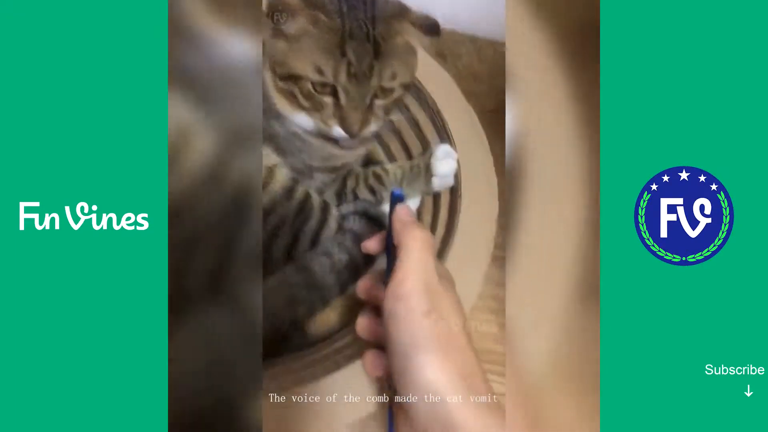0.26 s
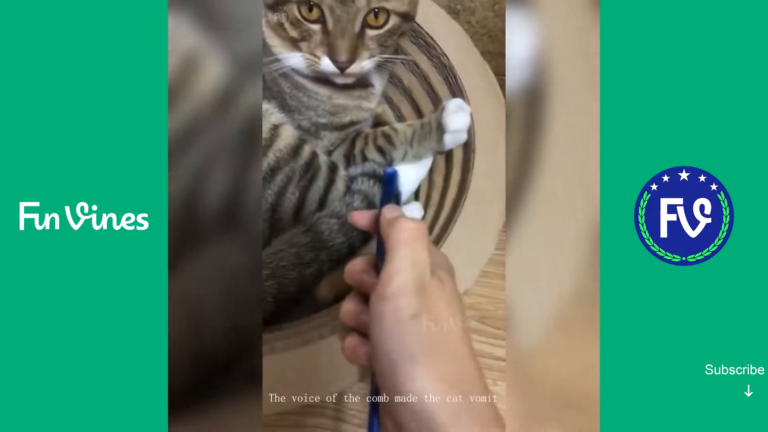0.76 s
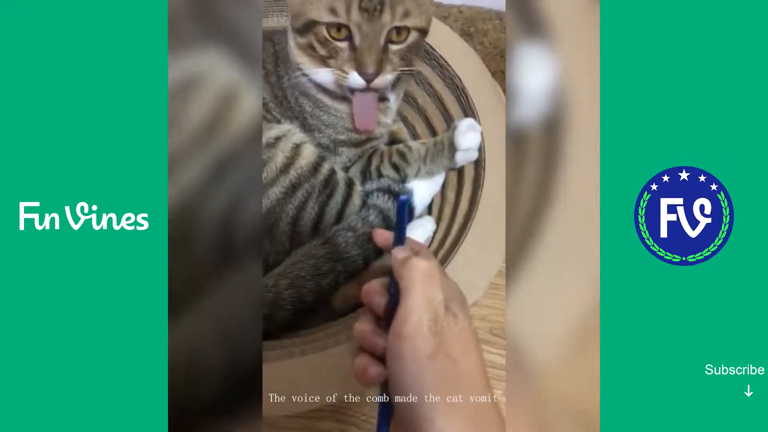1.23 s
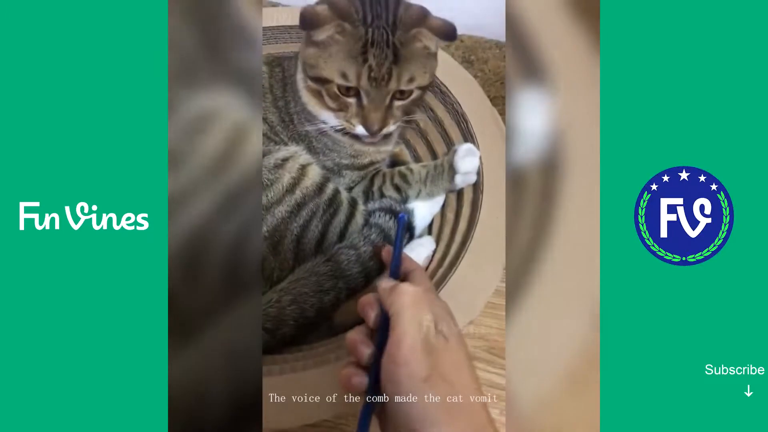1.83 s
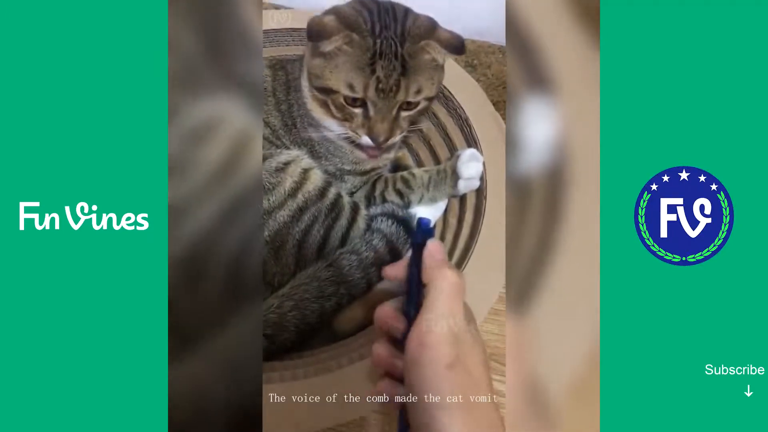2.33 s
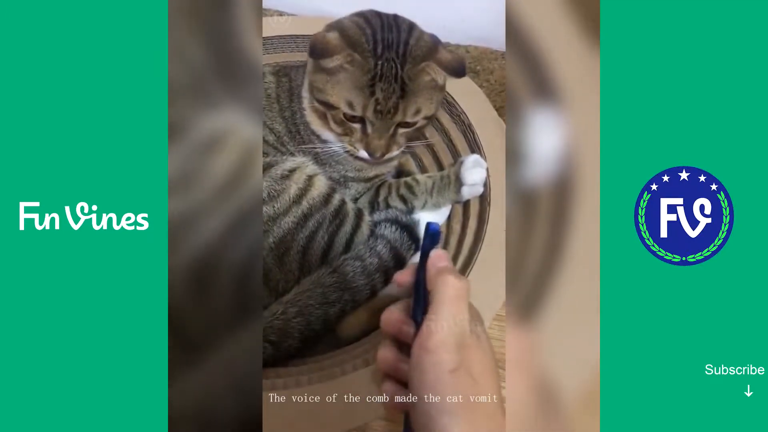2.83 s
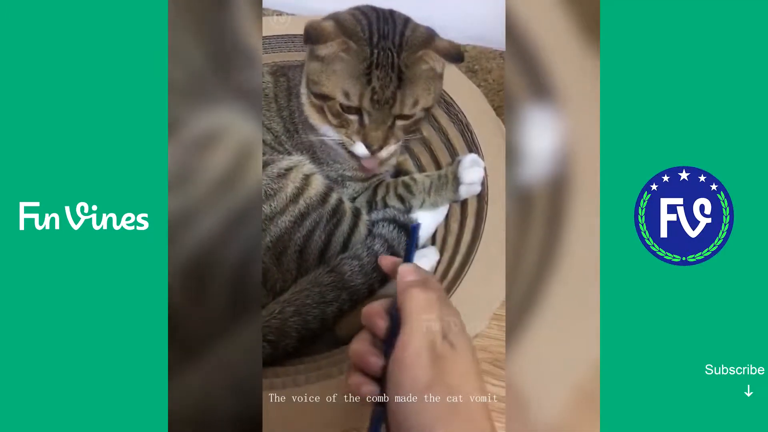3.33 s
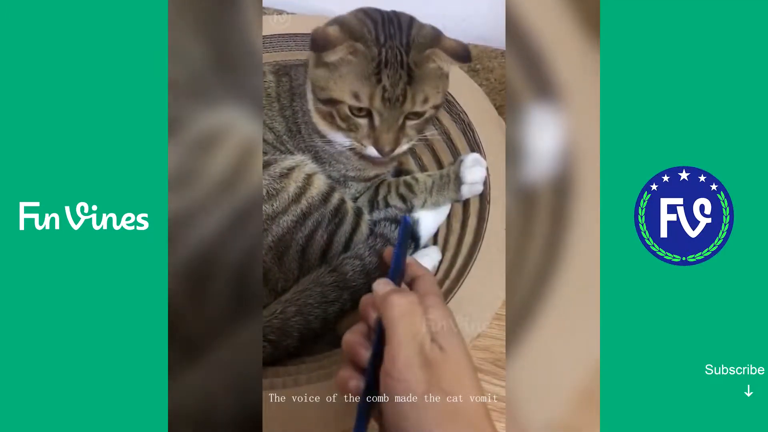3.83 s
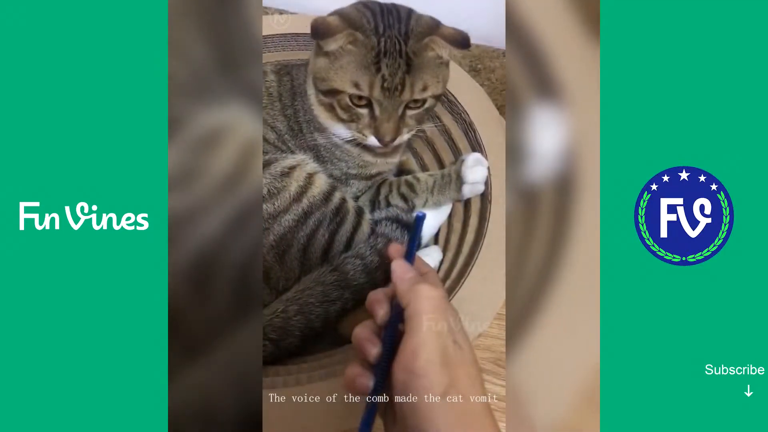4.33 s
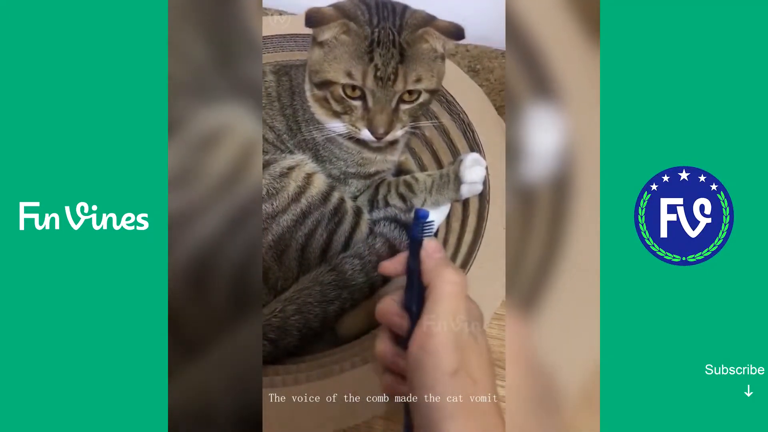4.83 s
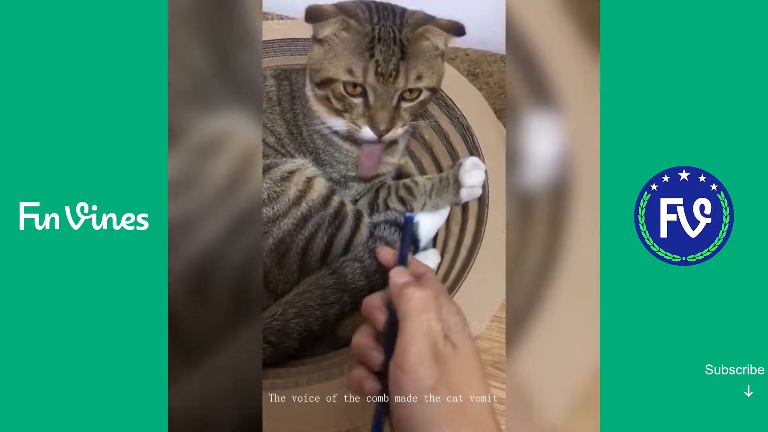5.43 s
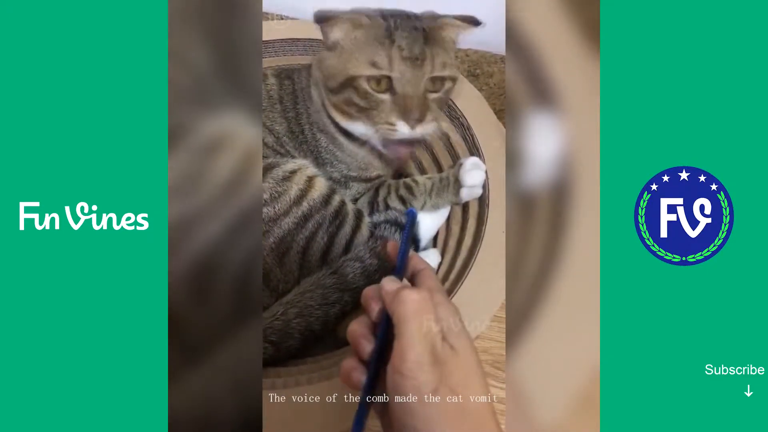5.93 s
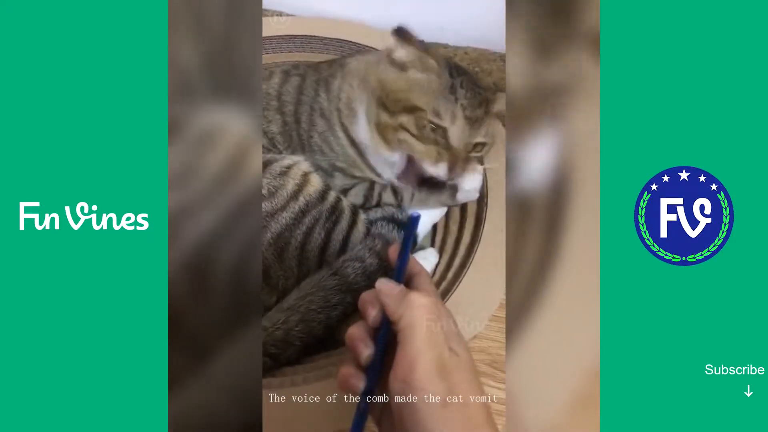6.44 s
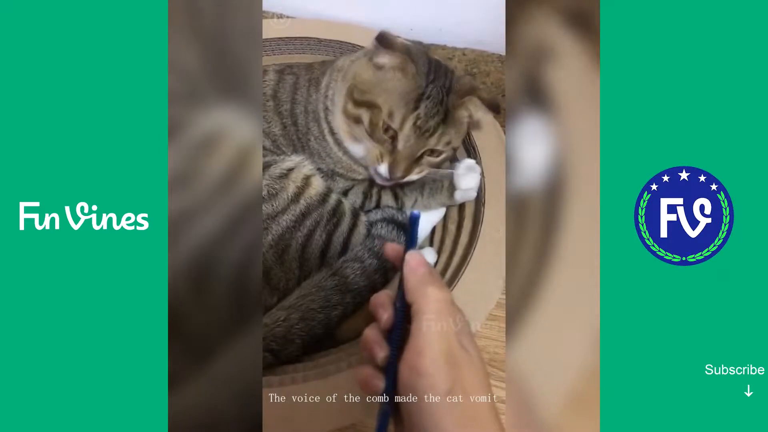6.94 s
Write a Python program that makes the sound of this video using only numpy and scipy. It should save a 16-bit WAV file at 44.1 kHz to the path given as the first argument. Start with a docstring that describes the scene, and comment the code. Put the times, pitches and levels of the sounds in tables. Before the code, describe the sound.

In a small, quiet room, a very faint wavering tone passes, then a plastic comb's teeth snap one after another under a finger, close to the microphone. The bright, ratchet-like ticking comes in three runs with brief gaps, the middle one quieter. A few light taps on the comb and soft rustles of a cat moving accompany it. Behind are a low hum and a hiss that rises with each run.

```python
"""In a small furnished room, close to a phone, a fingertip is drawn three times along a plastic comb.
Each tooth slips off with a snap that rattles the spine, then rings in its bending modes as a cantilever.
A faint, wavering low tone near 425 Hz is heard at the start.
Fingers tap lightly on the comb, and a cat shifting on its mat adds a few soft rustles.
Behind it lie room rumble, a machine's low hum, a thin whine and a faint hiss that swells and sinks."""
import sys
import numpy as np
from scipy import signal
from scipy.fft import rfft, irfft, next_fast_len
from scipy.io import wavfile
from scipy.ndimage import uniform_filter1d

SR = 44100
rng = np.random.default_rng(int(sys.argv[2]) if len(sys.argv) > 2 else 0)


def dump(signal):
    """Clip the signal to [-1, 1] and save it as 16-bit WAV at the path in sys.argv[1]."""
    limited = np.clip(np.atleast_2d(signal).T, -1, 1)
    pcm = np.round(limited * 32767).astype(np.int16)
    wavfile.write(sys.argv[1], SR, pcm)


N = 316197
TIME = np.arange(N) / SR
AGE = TIME[:11025]  # time since the onset of a short sound [s]


def undb(db):
    """Decibels to amplitude ratio."""
    return 10 ** (np.asarray(db) / 20)


def level(x, db):
    """Set the rms level of a steady sound."""
    return x * undb(db) / np.sqrt(np.mean(x ** 2))


def strength(x, db):
    """Set the energy of a transient, as its level if packed into 10 ms."""
    return x * undb(db) / np.sqrt(np.sum(x ** 2) / (SR / 100))


def colour(x, points, tilt_db=0):
    """Minimum-phase filter through (frequency [Hz], gain [dB]), tilted an octave either side of 5 kHz."""
    size = 2 * next_fast_len(len(x) // 2 + 1024)
    octave = np.log2(np.maximum(np.arange(size // 2 + 1) * SR / size, 1))
    hz, db = np.transpose(points)
    db = np.interp(octave, np.log2(hz), db) + tilt_db * np.clip(octave - np.log2(5000), -1, 1)
    cepstrum = irfft(np.log(undb(db)))
    cepstrum[1:size // 2] *= 2  # folding the cepstrum makes the filter causal
    cepstrum[size // 2 + 1:] = 0
    return irfft(rfft(x, size) * np.exp(rfft(cepstrum)))[:len(x)]


def broad_resonance(hz):
    """Heavy damping gives a wide peak: (frequency [Hz], gain [dB])."""
    return [(hz / 10, -14), (hz / 1.37, -13), (hz, 0), (hz * 1.35, -14), (hz * 4, -32)]


def wander(rate_hz):
    """Smooth random fluctuation of unit rms."""
    hold = int(SR / rate_hz)
    steps = np.repeat(rng.standard_normal(N // hold + 1), hold)
    return level(uniform_filter1d(uniform_filter1d(steps, hold), hold)[:N], 0)


def decay(t60):
    """Exponential damping: 60 dB in t60 seconds."""
    return np.exp(-np.log(1000) * AGE / t60)


def sine(hz):
    """Simple harmonic motion at a random phase."""
    return np.sin(2 * np.pi * (hz * AGE + rng.random()))


def add(out, onset, x):
    """Superpose a short sound at its onset [s]."""
    i = max(int(onset * SR), 0)
    out[i:i + len(x)] += x[:N - i]


def room_rumble():
    """Low-frequency noise under slight, slow amplitude modulation."""
    # spectrum of the rumble: (frequency [Hz], gain [dB])
    spectrum = [(20, -13.5), (32, -11.5), (42, 7), (62, -0.5), (78, -8.5), (110, -8), (140, -15),
                (240, -13), (300, -20.5), (420, -29), (700, -30.5), (2000, -65.5)]
    noise = colour(rng.standard_normal(N), spectrum)
    return level(noise * undb(0.87 * wander(2.7)), -55)


def machine_hum(waver_db=2, loudest_s=3.7, throb_s=1.04, swell_s=0.54):
    """A household machine's line spectrum wavers in pitch and level; the lowest line throbs and swells."""
    # lines of the hum: (frequency [Hz], level [dB])
    partials = [(64, -53.5), (108, -63.5), (220, -79), (393, -78)]
    lines = []
    for hz, db in partials:
        drift_hz = (1.233 + 0.00792 * hz) * wander(8)
        phase = 2 * np.pi * np.cumsum(hz + drift_hz) / SR
        lines.append(level(np.sin(phase) * undb(waver_db * wander(6)), db))
    since = TIME - loudest_s
    throb_db = 2 * np.cos(2 * np.pi * since / throb_s)
    swell_db = 5 * np.exp(-(since / swell_s) ** 2)
    return lines[0] * level(undb(throb_db + swell_db), 0) + sum(lines[1:])


def hiss(floor_db=-69, lift_db=9.5, ramp_s=0.037):
    """Broadband noise, stepping up at the outset and from each run of ticks until a little after it."""
    # spectrum of the hiss: (frequency [Hz], gain [dB])
    spectrum = [(100, -5.5), (400, -2), (1000, 0), (2200, -2), (4500, -5.5), (8500, -10), (10500, -15.5),
                (13000, -16), (15500, -48.5)]
    # spans of louder hiss: (start [s], end [s])
    spans = [(-.1, 0.13), (.68, 2.56), (3.08, 4.42), (5.23, 6.91)]
    raised = sum(np.clip(np.minimum(TIME - start, end - TIME) / ramp_s + .5, 0, 1) for start, end in spans)
    return level(colour(rng.standard_normal(N), spectrum), floor_db) * undb(lift_db * raised)


def electrical_whine():
    """Narrow-band noise is heard as a faint, high pitch."""
    # spectral peak of the whine: (frequency [Hz], gain [dB])
    spectrum = [(8000, -32.5), (8480, 0), (9000, -31.5)]
    return level(colour(rng.standard_normal(N), spectrum), -83)


def low_tone_and_rustles(grain_db=2):
    """Resonance-filtered noise in Gaussian swells: first a faint, wavering low tone, later soft rustles."""
    # the first two swells are the tone near 425 Hz, the rest are friction of hand, fur and mat:
    # (time [s], peak level [dB], length [s], centre frequency [Hz])
    swells = [(0.07, -61.5, 0.08, 424), (0.193, -63.5, 0.073, 430), (.29, -68, 0.14, 10000),
              (0.436, -66, 0.044, 6340), (1.675, -59, 0.027, 250), (4.474, -71, .06, 6200),
              (5.513, -52.5, 0.027, 253), (6.284, -54.5, 0.1, 2560), (6.305, -55, 0.019, 746)]
    grainy_noise = rng.standard_normal(N) * undb(grain_db * wander(400))
    out = np.zeros(N)
    for peak_s, db, length, hz in swells:
        near = np.abs(TIME - peak_s) < 2 * length
        swell = np.exp(-2 * ((TIME[near] - peak_s) / length) ** 2)
        out[near] += swell * level(colour(grainy_noise[near], broad_resonance(hz)), db)
    return out


def finger_taps(t60=0.021, rise_s=.0015):
    """Each soft impact of a finger on the comb excites one heavily damped resonance."""
    # contacts: (time [s], level [dB], centre frequency [Hz])
    contacts = [(0.145, -53.5, 2220), (0.661, -64, 2100), (1.665, -51, 4200), (2.562, -51, 2096),
                (3.0909, -35, 6540), (6.288, -49.5, 2030), (6.928, -58, 3570)]
    out = np.zeros(N)
    for onset, db, hz in contacts:
        push = rng.standard_normal(len(AGE)) * decay(t60) * (1 - np.exp(-AGE / rise_s))
        tap = strength(colour(push, broad_resonance(hz)), db)
        add(out, onset, room_reflections(tap))
    return out


def room_reflections(x, gap_s=0.0055, t60=0.18, tail_db=-11, bounce_db=-18):
    """Direct sound, an early reflection and a diffuse tail, new for each tick as the hand keeps moving."""
    # colour of the tail: (frequency [Hz], gain [dB])
    spectrum = [(900, -4.0), (3000, -5.5), (4500, -4.0), (10500, -5.5),
                (11400, -4.5), (12600, 0.5), (14200, -1.5), (15500, -4.5)]
    tail = colour(rng.standard_normal(len(AGE)) * decay(t60) * (AGE > gap_s), spectrum)
    response = tail * undb(tail_db) / np.sqrt(np.sum(tail ** 2))
    response[int(gap_s * rng.uniform(.85, 1.25) * SR)] += undb(bounce_db)
    return x + signal.fftconvolve(x, response)[:len(x)]


def spine_snap(db, tilt_db, shared_rattle, crack_t60=0.0029, rattle_t60=0.022):
    """Impulse excitation: a tooth slips free with a kick and a crack, setting the spine's modes ringing."""
    # response of the spine's dense, well damped modes: (frequency [Hz], gain [dB])
    spectrum = [(400, -24), (800, -15.5), (1800, -20), (2550, 0), (4450, -0.5), (4950, -8.5), (5400, -0.5),
                (7000, -1.5), (7750, -6), (8800, 3.5), (10500, 0), (12800, 1.5), (15200, -8), (16000, -16)]
    # its distinct modes: (frequency [Hz], t60 [s], level relative to the snap [dB])
    modes = [(1820, 0.044, -28.5), (2990, 0.076, -17.5), (3460, 0.047, -25), (4268, 0.024, -12),
             (4490, 0.23, -21), (5340, .035, -16), (6990, 0.026, -17.5), (9017, .03, -9),
             (9820, 0.039, -19), (12850, .03, -20)]
    noise = rng.standard_normal(len(AGE))
    crack = noise * decay(crack_t60)
    rattle = (shared_rattle + noise) / np.sqrt(2) * decay(rattle_t60)
    burst = (crack + rattle) * undb(-2)
    burst[0] += undb(15)  # the kick
    out = strength(colour(burst, spectrum, tilt_db), db)
    for hz, t60, mode_db in modes:
        grip_shift = 1 + 0.0052 * rng.standard_normal()
        out += strength(sine(hz * grip_shift) * decay(t60), db + mode_db)
    return out


def tooth_pitches(place, longest_place=.45, longest_hz=897):
    """Four mode frequencies [Hz]: a longer cantilever rings lower, and mid-comb teeth are the longest."""
    end_hz, reach = (944, longest_place) if place < longest_place else (926, 1 - longest_place)
    first_hz = longest_hz + (end_hz - longest_hz) * ((place - longest_place) / reach) ** 2
    second_hz = 4456 + 214.6 * max(1 - (place / 0.34) ** 2, 0)  # higher over the first third
    return first_hz, second_hz, 12.55 * first_hz, 15.0 * first_hz


def tooth_levels(place, first_db, second_db, upper_db, third_lead_db):
    """Energy partition among four modes [dB]: along the comb the first fades and the upper two even out."""
    faded_db = first_db - 7.5 * place ** 2
    damped_db = min(faded_db, second_db + 5)  # a finger that damps the second mode damps the first too
    lead_db = third_lead_db * (1 - place)
    fourth_db = upper_db - 10 * np.log10(1 + undb(lead_db) ** 2)
    return damped_db, second_db, fourth_db + lead_db, fourth_db


def tooth_ring(pitches_hz, levels_db, neighbour_count=4):
    """A cantilever's bending modes swell and die; untouched, detuned neighbours ring longer in sympathy."""
    # bending modes: (rise [s], t60 [s], then for the neighbours:
    # detuning spread [ratio], relative level [dB], t60 [s])
    modes = [(0.00077, 0.15, 0.0077, -15.5, 0.46), (0.00056, 0.054, 0.00799, -8.5, 0.13),
             (0.0058, 0.011, 0.011, -3, 0.023), (0.0013, 0.016, .03, 3, 0.022)]
    out = 0
    for hz, db, (rise, t60, detune, neighbour_db, neighbour_t60) in zip(pitches_hz, levels_db, modes):
        swell = (1 - np.exp(-AGE / rise)) ** 2
        plucked = strength(sine(hz) * swell * decay(t60), 0)
        neighbours = sum(sine(hz * (1 + detune * k)) for k in rng.standard_normal(neighbour_count))
        sympathetic = strength(neighbours * swell * decay(neighbour_t60), neighbour_db)
        out = out + strength(plucked + sympathetic, db)
    return out


def comb_strokes():
    """Plucking: the fingertip bends and releases the teeth in turn, all coupled to the same spine."""
    # passes of the finger, each coloured by its grip: (start [s], end [s], snap tilt [dB/octave],
    # then at the first tooth: first mode's level before damping [dB], third mode over fourth [dB])
    strokes = [(.6, 2.3, -1.5, -38.5, 10), (3.0, 4.3, .2, -41.5, 1.5), (5.1, 6.6, -2, -39, 2)]
    # tooth releases, each ringing by where the finger catches it:
    # (time [s], snap level [dB], second mode's level [dB], joint level of the upper two modes [dB])
    releases = [(.6937, -28, -28.5, -30), (0.7893, -29, -33, -23), (.867, -29.5, -35, -21),
                (0.9228, -30.5, -32, -19), (0.9921, -28.5, -34.5, -18), (1.091, -27, -36.5, -23),
                (1.1903, -27, -30.5, -24.5), (1.2953, -25, -29, -23.5), (1.411, -25.5, -31.5, -27.5),
                (1.5162, -25, -29, -31), (1.6084, -27, -29, -31), (1.6933, -26.5, -31, -29.5),
                (1.741, -28.5, -27, -30), (1.8037, -27, -28.5, -36.5), (1.9121, -28.5, -33, -39),
                (2.0805, -28.5, -30, -41.5), (2.1331, -31, -35.5, -38), (2.1603, -33, -38.5, -40),
                (3.0775, -37, -37.5, -33), (3.092, -34, -64, -46.5), (3.1208, -36, -43.5, -36.5),
                (3.196, -38.5, -40.5, -26), (3.284, -37, -40, -28.5), (3.3382, -38, -42.5, -33.5),
                (3.3547, -36, -47, -29.5), (3.412, -36, -47, -32.5), (3.4602, -35.5, -42.5, -33.5),
                (3.5609, -37.5, -37, -34), (3.6083, -36, -44, -31), (3.6496, -37, -40.5, -35),
                (3.707, -37, -33.5, -34.5), (3.8047, -39.5, -39, -38), (3.8753, -38, -38, -31.5),
                (3.9304, -33.5, -25.5, -28), (3.9973, -27.5, -31.5, -29.5), (4.0704, -32.5, -71, -41),
                (4.159, -33, -47, -40), (4.2088, -37.5, -52, -53), (5.2235, -28.5, -33.5, -26),
                (5.2528, -27.5, -41, -25), (5.2996, -28, -46, -24.5), (5.358, -28, -44.5, -24),
                (5.4187, -29, -44.5, -26.5), (5.4612, -28, -34.5, -27), (5.5305, -30.5, -34.5, -29.5),
                (5.5935, -30, -36.5, -30.5), (5.6388, -29.5, -44, -33), (5.724, -29, -38, -31),
                (5.7835, -28.5, -42, -33.5), (5.8916, -27, -34, -33), (5.9835, -27, -36, -34),
                (6.1187, -27.5, -34, -30), (6.3507, -27, -33.5, -30.5), (6.4301, -28, -35, -25.5),
                (6.472, -34.5, -45, -36)]
    out = np.zeros(N)
    shared_rattle = rng.standard_normal(len(AGE))
    for start, end, tilt_db, first_db, third_lead_db in strokes:
        teeth = [row for row in releases if start <= row[0] < end]
        places = np.linspace(0, 1, len(teeth))  # 0 at the first tooth, 1 at the last
        for place, (onset, snap_db, second_db, upper_db) in zip(places, teeth):
            levels_db = tooth_levels(place, first_db, second_db, upper_db, third_lead_db)
            ring = tooth_ring(tooth_pitches(place), levels_db)
            snap = spine_snap(snap_db, tilt_db, shared_rattle)
            add(out, onset, room_reflections(snap + ring))
    return out


def scene():
    """Superposition of comb, taps, low tone and rustles with the room's background, in one channel."""
    foreground = comb_strokes() + finger_taps() + low_tone_and_rustles()
    background = room_rumble() + machine_hum() + hiss() + electrical_whine()
    return (foreground + background)[None]


def record(dry, cutoff_hz=15800):
    """Band limiting: the phone's steep low-pass filter removes the highest treble."""
    return signal.sosfilt(signal.ellip(8, .2, 70, cutoff_hz, fs=SR, output="sos"), dry)


dry = scene()
out = record(dry)
dump(out)
```